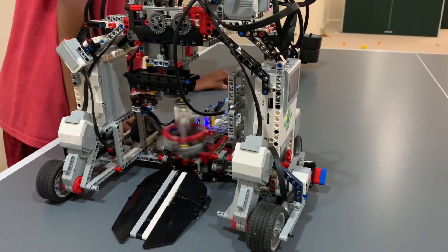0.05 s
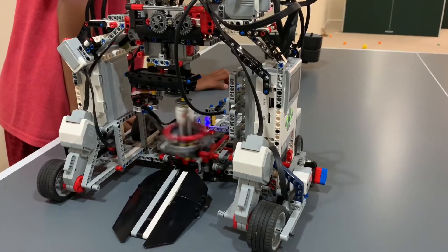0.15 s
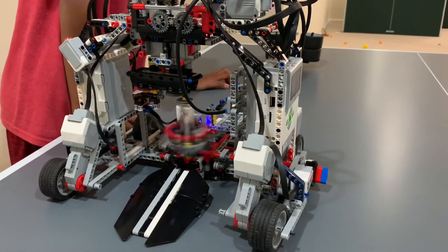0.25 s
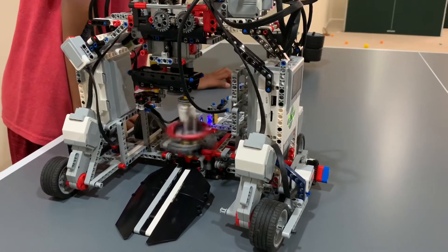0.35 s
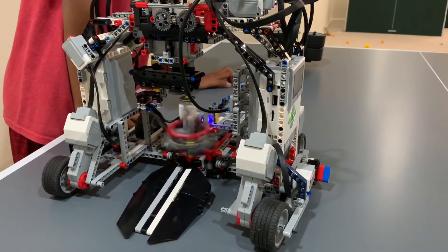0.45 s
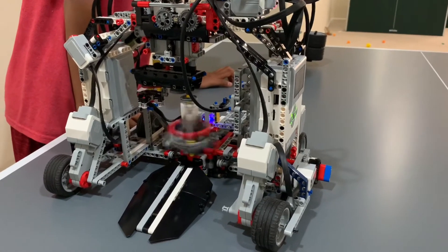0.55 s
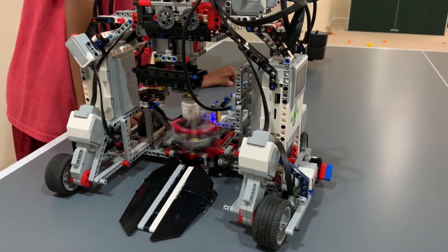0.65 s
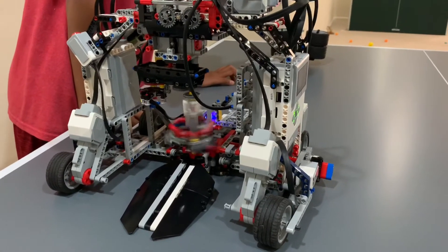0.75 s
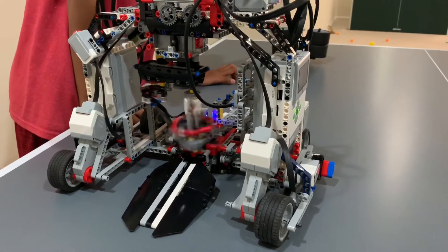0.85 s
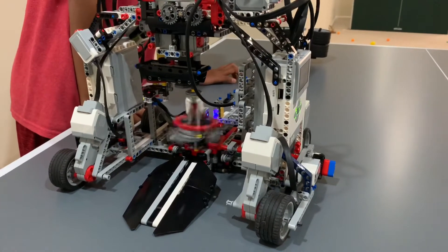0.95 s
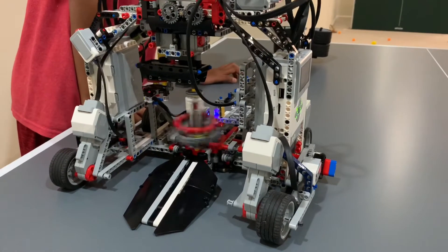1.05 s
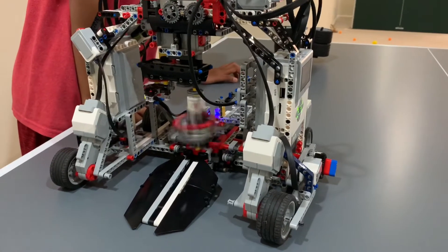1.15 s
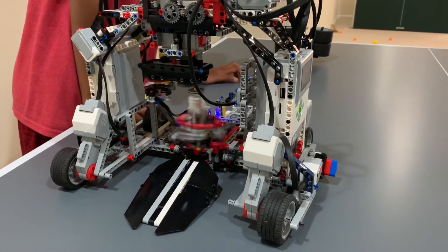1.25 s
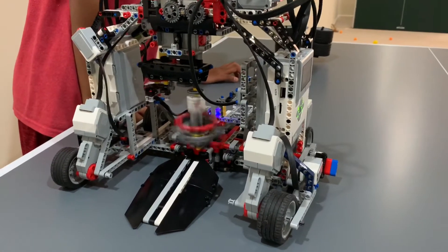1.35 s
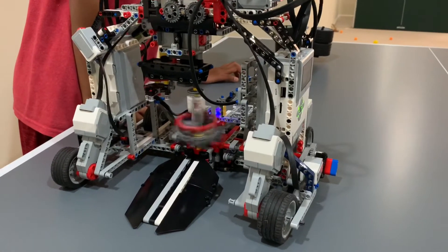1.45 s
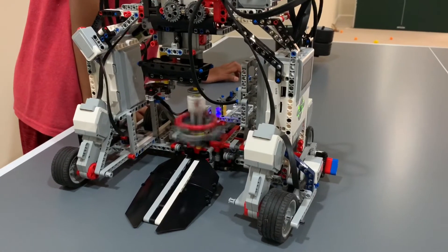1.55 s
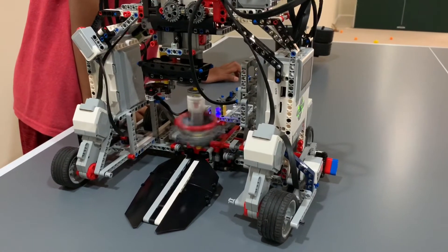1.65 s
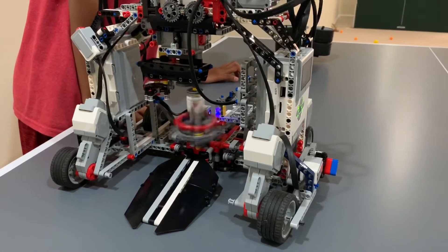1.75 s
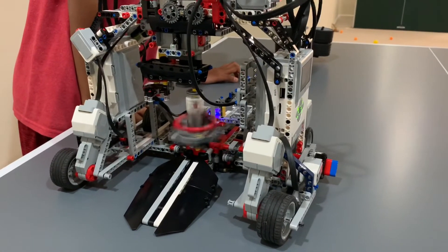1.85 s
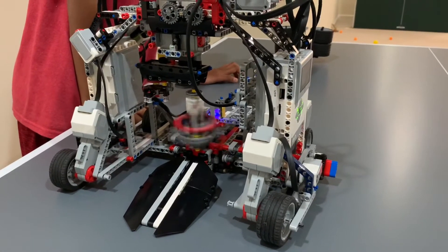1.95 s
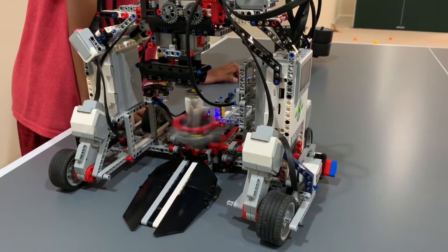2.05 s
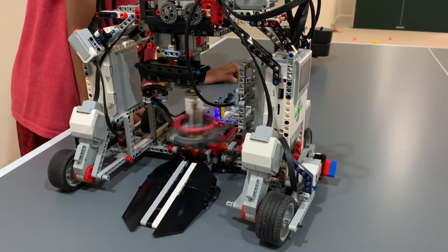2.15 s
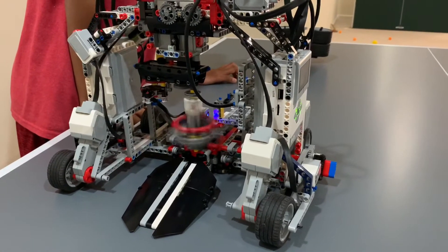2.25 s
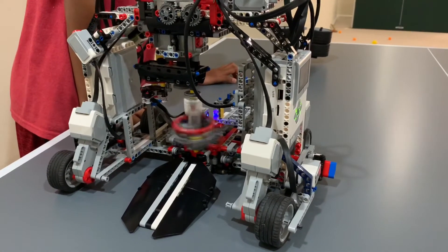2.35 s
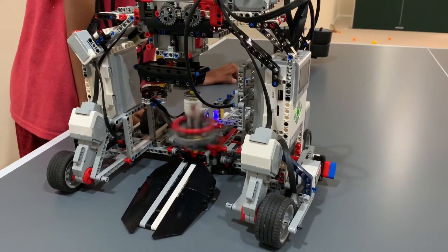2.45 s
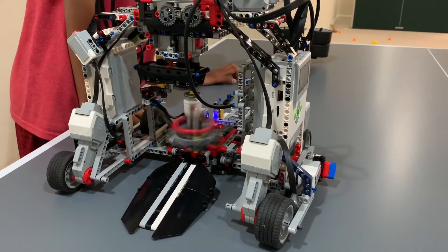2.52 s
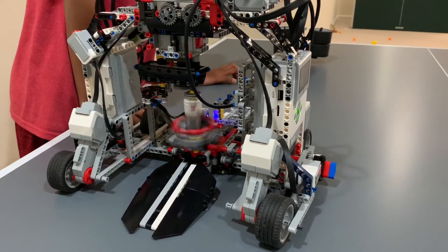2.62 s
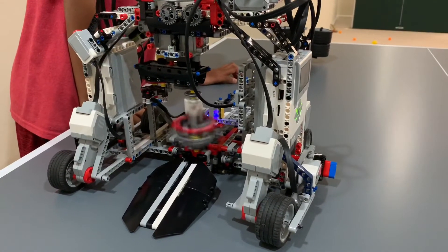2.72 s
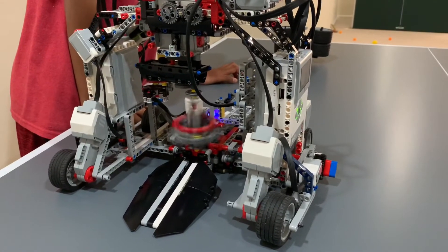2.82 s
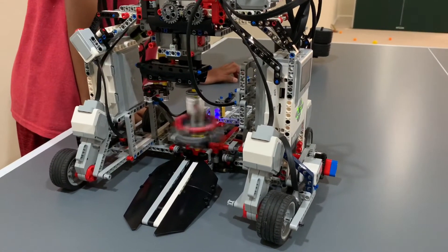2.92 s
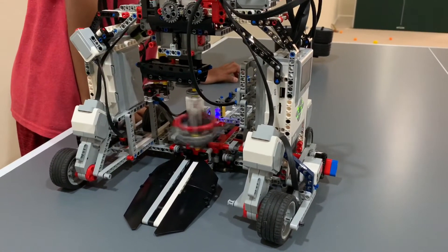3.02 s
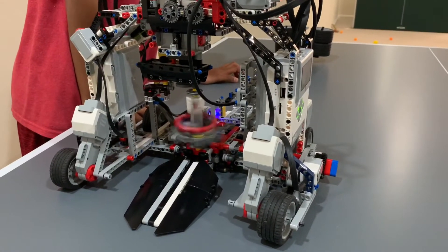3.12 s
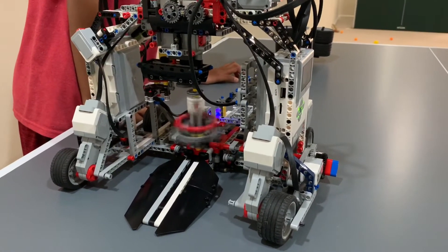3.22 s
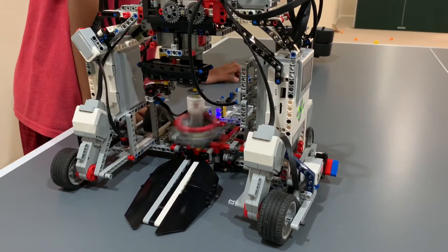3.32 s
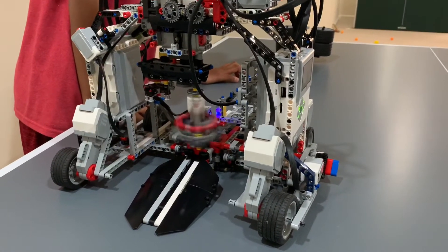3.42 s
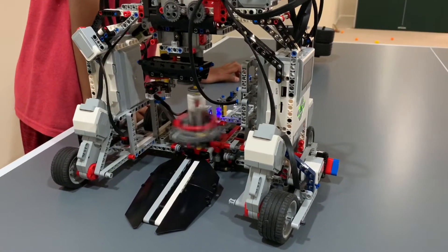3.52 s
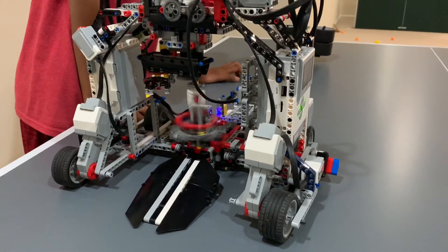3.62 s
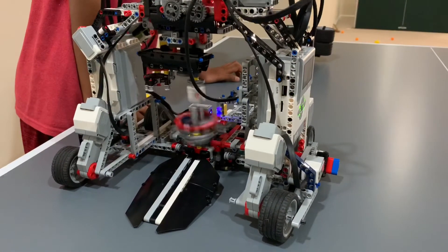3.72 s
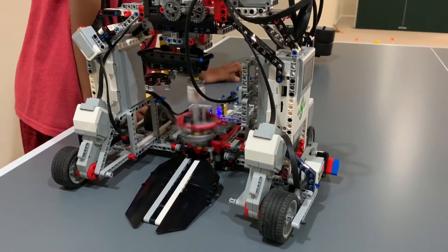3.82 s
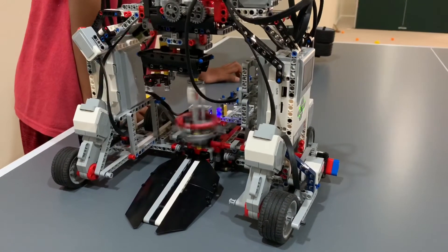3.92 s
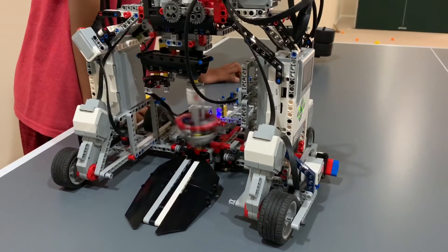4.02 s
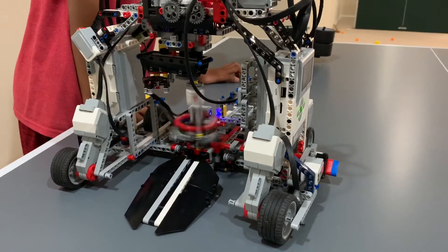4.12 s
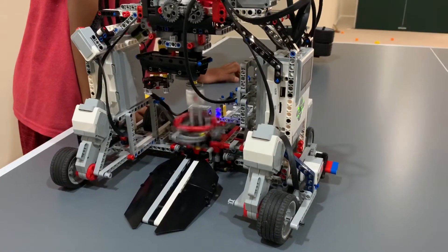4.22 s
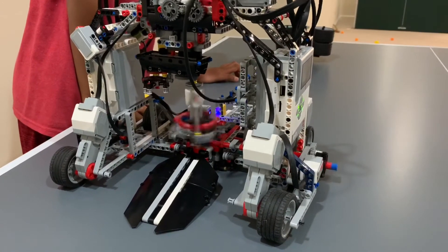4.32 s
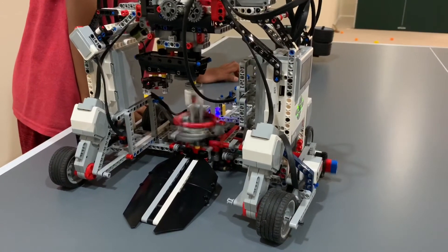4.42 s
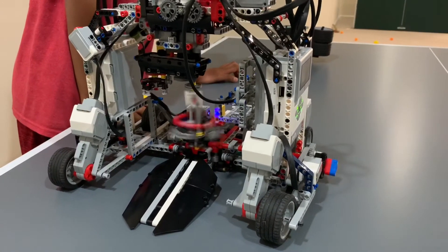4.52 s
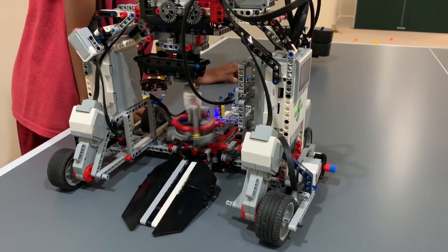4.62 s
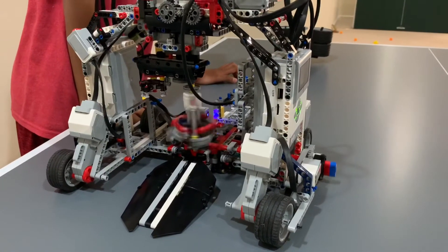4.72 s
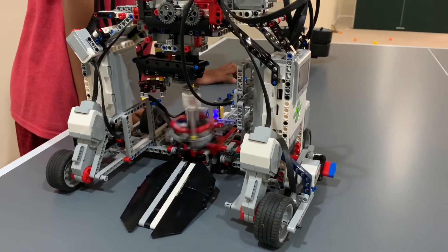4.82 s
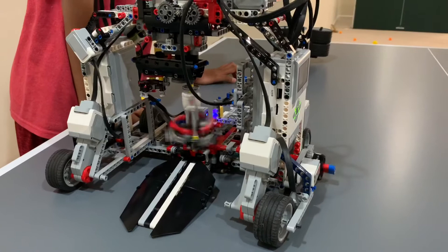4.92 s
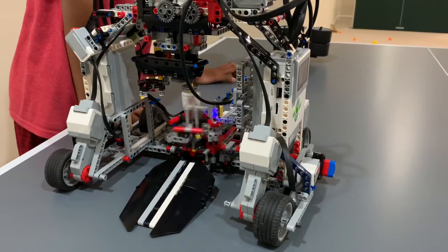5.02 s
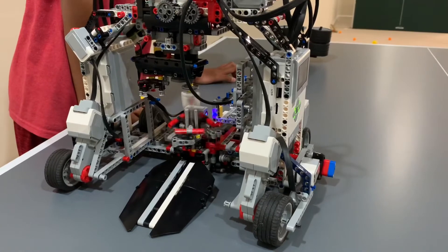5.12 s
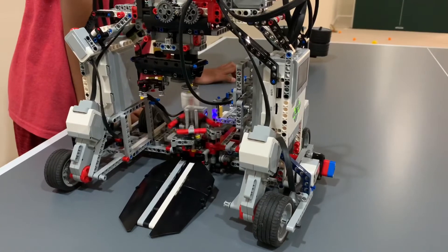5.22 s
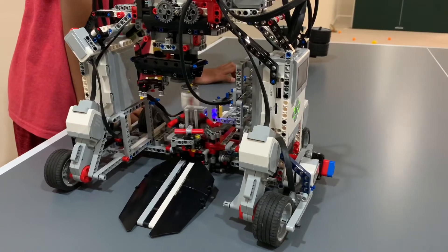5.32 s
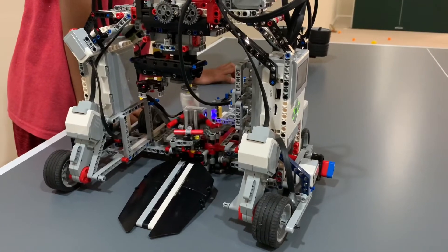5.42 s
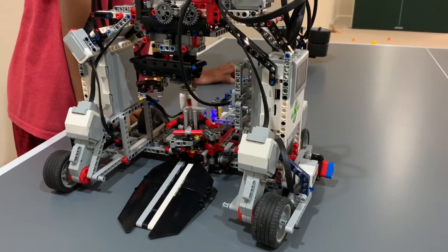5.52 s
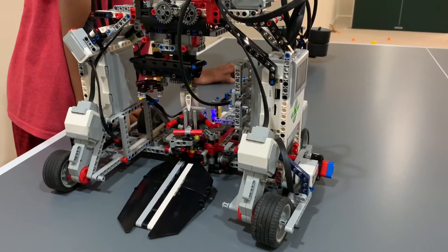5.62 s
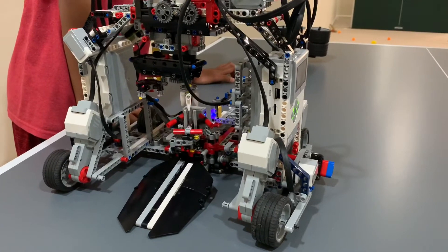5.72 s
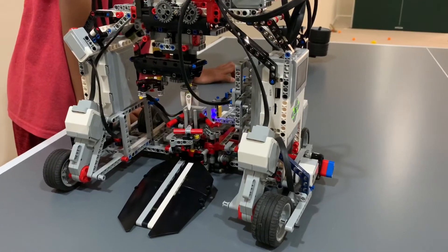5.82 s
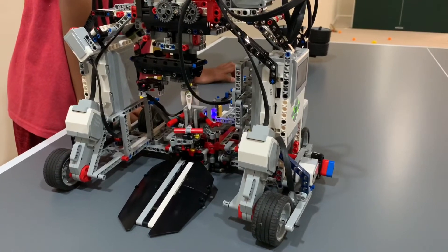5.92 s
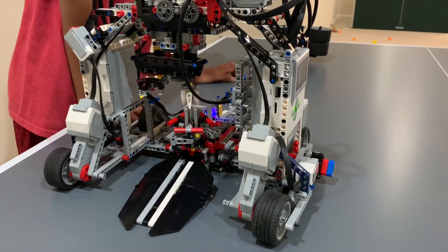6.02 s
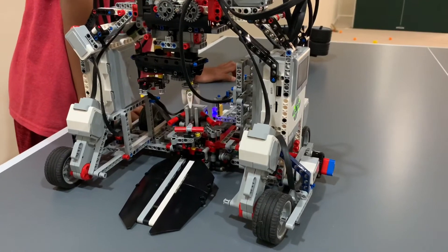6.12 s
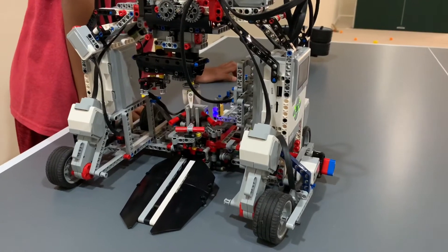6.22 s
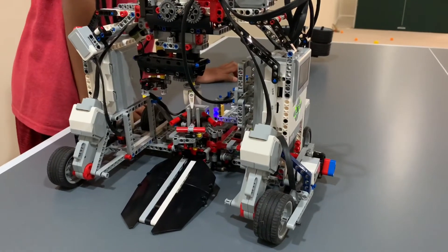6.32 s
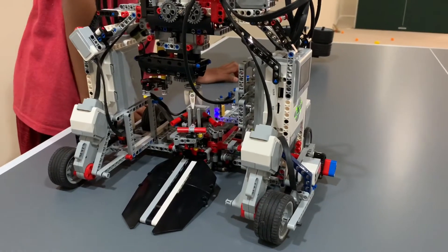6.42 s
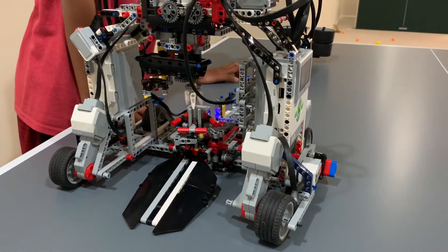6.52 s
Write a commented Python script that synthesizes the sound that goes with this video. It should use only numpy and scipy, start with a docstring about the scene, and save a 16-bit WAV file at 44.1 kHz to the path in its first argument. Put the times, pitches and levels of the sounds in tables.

```python
"""The gears of a toy robot's launcher whine and chatter as its motor runs up: meshing teeth give tones and ticks.
A top of plastic bricks clacks in its holder (filtered noise bursts and struck modes), then runs free for a moment.
Its lugs rattle against the frame until it is braked (cracks, ringing modes, a wall echo); its rim rubs and groans.
The table thuds under the robot, the gears idle and stop, a faint rustle swells, and the room hums throughout."""
import sys
import numpy as np
from scipy import signal
from scipy.fft import rfft, irfft, next_fast_len
from scipy.io import wavfile

SR = 44100
rng = np.random.default_rng(int(sys.argv[2]) if len(sys.argv) > 2 else 0)


def to_wav(sig):
    """Store sig (one row per channel, or 1-D mono) as 16-bit WAV at the path in sys.argv[1].

    Samples outside -1..1 are clipped; the rate is SR.
    """
    pcm = np.clip(np.atleast_2d(sig), -1, 1) * 32767
    pcm = np.round(pcm).astype(np.int16)
    wavfile.write(sys.argv[1], SR, pcm.T)  # frames by channels


N = 289501

# relative spectrum of a contact crack: (frequency [Hz], level [dB])
CRACK_SPECTRUM = [(150, -20), (1200, -17.5), (3000, -11.5), (5600, -11.5), (7200, 0.5), (11000, 2),
                  (12600, 5), (14200, 2.5), (15500, -0.5)]
# relative spectrum of the ringing frame: (frequency [Hz], level [dB])
FRAME_SPECTRUM = [(150, -14), (400, -14.5), (600, -9.5), (1200, -10), (2800, -2.5), (4800, -3.5),
                  (9000, -5.5), (13000, -12.5), (15500, -18)]
# the top's rim rubs on the frame:
# (start [s], end [s], rim level [dB], change of tooth noise [dB], change of whine [dB])
RIM_RUBS = [(.66, .92, -45.5, 2, 4), (1.14, 1.25, -45.5, 1.5, 4), (3.506, 3.638, -41.5, 6, 17),
            (4.111, 4.504, -38.5, -1, -0.5), (4.54, 4.956, -37, 4.5, 9.5)]

# tooth rates: at the start, approached under load, and with the top let go; time constant of the run-up
START_HZ, DRIVEN_HZ, FREE_HZ, RUN_UP_S = 1225, 1890, 2000, 0.7
# the top is let go; the motor is cut; the gears then fall by 60 dB in this time
RELEASE_S, STOP_S, COAST_S = 3.7, 5.372, 0.24


def amp(db):
    """Level in decibels to amplitude ratio, by the factor 20 law."""
    return 10 ** (np.asarray(db) / 20)


def unit(x):
    """Normalisation to a root-mean-square of 1."""
    return x / np.sqrt(np.mean(x ** 2) + 1e-20)


def clock():
    """Sampled time: seconds at each sample."""
    return np.arange(N) / SR


def along(points, hz):
    """Interpolation of (Hz, value) points on a logarithmic frequency axis."""
    f, v = np.transpose(points)
    return np.interp(np.log(hz + 1), np.log(f + 1), v)


def during(start, end, fade):
    """Trapezoidal gate: 1 between two times, with sloping edges inside them."""
    edge_distance = np.minimum(clock() - start, end - clock())
    return np.clip(edge_distance / fade, 0, 1)


def wobble(rate):
    """Band-limited random modulation: a smooth curve with `rate` random knots a second."""
    size = int(N * rate / SR) + 2
    fine = signal.resample(rng.standard_normal(size), 10 * size)
    return np.interp(clock() * rate * 10, np.arange(len(fine)), fine)


def turn(hz):
    """Phase [rad] as the time integral of a changing rate."""
    return 2 * np.pi * np.cumsum(hz) / SR


def filtered(x, response):
    """Linear filtering: the spectrum of x times a complex frequency response."""
    size = next_fast_len(N + SR // 2, True)
    return irfft(rfft(x, size) * response(np.fft.rfftfreq(size, 1 / SR)), size)[..., :N]


def coloured(x, spectrum):
    """Minimum-phase filtering: a causal pulse of unit energy, shaped by the spectrum through its cepstrum."""
    size = 2048
    log_spectrum = np.log(amp(along(spectrum, np.fft.rfftfreq(size, 1 / SR))))
    cepstrum = irfft(log_spectrum)
    pulse = irfft(np.exp(rfft(2 * cepstrum[:size // 2], size)))
    return signal.fftconvolve(x, pulse / np.linalg.norm(pulse))[:N]


def noise():
    """White noise: independent Gaussian samples."""
    return rng.standard_normal(N)


def bursts(times, levels_db, rise, t60, crackle_db=1.8):
    """Impact noise: crackly noise flares at each time and decays exponentially; overlapping powers add."""
    t = np.arange(SR // 4) / SR
    shape = (1 - np.exp(-t / rise)) ** 2 * amp(-60 * t / t60)
    power = np.bincount(np.round(times * SR).astype(int), amp(levels_db) ** 2, N)
    grain = unit(noise() * amp(crackle_db * wobble(900)))
    envelope = np.sqrt(np.abs(signal.fftconvolve(power, (shape / shape.max()) ** 2)[:N]))
    return envelope * grain


def tails(t60_points, size):
    """Diffuse reverberation: two unrelated noise tails of about unit energy, decaying by frequency."""
    hz, t, z = signal.stft(rng.standard_normal((2, size)), SR, nperseg=256)
    decay = amp(-60 * t / along(t60_points, hz)[:, None])
    tail = signal.istft(z * decay, SR, nperseg=256)[1]
    return tail / np.linalg.norm(tail[0])


def tone(hz, flutter):
    """Frequency and amplitude modulation: backlash makes a gear note's pitch and strength unsteady."""
    carrier = np.sin(turn(hz * (1 + flutter * wobble(120))))
    strength_db = 2.3 * wobble(24) + 1.5 * wobble(110)
    return unit(carrier * amp(strength_db))


def room_tone():
    """Partly coherent noise for the background, plus slightly unsteady sinusoids for the hum."""
    # relative spectrum of the background noise: low rumble and faint hiss, with a dip near 8300 Hz:
    # (frequency [Hz], level [dB])
    background_spectrum = [(15, -50), (22, -32), (50, -11.5), (78, -6), (99, -14), (123, -7), (145, -10.5),
                           (254, -13), (315, -23.5), (380, -19.5), (483, -30), (826, -29), (2500, -45.5),
                           (8300, -65), (11000, -57), (15600, -108)]
    # left-right likeness of the background noise: (frequency [Hz], correlation [1])
    background_likeness = [(60, .92), (130, 0.76), (290, 0.858), (640, 0.14), (1400, 0.76), (8000, 0)]
    # mains and fans: (frequency [Hz], mean rms level [dB])
    hum_notes = [(64.6, -60), (119.7, -54.5), (180, -61.5)]

    def mid_side_response(hz):
        # mid and side shares that give the wanted correlation
        angle = np.arccos(np.clip(along(background_likeness, hz), -1, 1)) / 2
        return amp(along(background_spectrum, hz)) * [np.cos(angle), np.sin(angle)]

    mid, side = filtered(rng.standard_normal((2, N)), mid_side_response)
    background = amp(-50) * unit(np.array([mid + side, mid - side]))
    hum = np.zeros(N)
    for hz, db in hum_notes:
        hum += amp(db + 1.5 * wobble(5)) * np.sqrt(2) * np.sin(turn(hz + wobble(6)))
    return background + hum


def rustle():
    """Friction noise: something brushes softly against the frame, swelling after the gears stop."""
    start_s, rise_s, level_db = 6.44, 0.11, -73
    swell = np.clip((clock() - start_s) / rise_s, 0, 1)
    return amp(level_db) * swell * coloured(noise(), FRAME_SPECTRUM)


def thuds():
    """Damped oscillation: the rocking robot makes the table top answer with a short, low note."""
    # blows on the table: (time [s], level before an 8 dB lift [dB])
    table_blows = np.array([(0.801, -46.5), (0.871, -44.5), (4.231, -44.5), (4.629, -51), (4.745, -50.5),
                            (6.261, -49.5)])
    t = np.maximum(clock() - table_blows[:, :1], 0)
    ring = np.sin(2 * np.pi * 178 * t) * (1 - np.exp(-t / 0.0024)) * amp(-60 * t / 0.28)
    return amp(table_blows[:, 1] + 8.0) @ ring


def rubbing():
    """Contact envelope: how firmly the rim touches, 0-1, one row for each rub."""
    attack_s, release_s = 0.055, 0.065  # ramps before the start and after the end
    start, end = np.transpose(RIM_RUBS)[:2, :, None]
    nearest_edge = np.minimum((clock() - start) / attack_s, (end - clock()) / release_s)
    return np.clip(1 + nearest_edge, 0, 1)


def groan():
    """Stick-slip of the rim in its last turns: a short, hoarse note of unsteady pitch."""
    # the note: (start [s], end [s], frequency [Hz], level [dB])
    stick_slip = (4.5, 5, 998, -49.5)
    start, end, hz, db = stick_slip
    return amp(db) * during(start, end, 0.05) * tone(hz, flutter=0.024)


def grind():
    """Friction noise: the wobbling rim brushes the frame, and at last drags ever more weakly as the top slows."""
    # relative spectrum of the rubbing rim: (frequency [Hz], level [dB])
    rim_spectrum = [(150, -17.5), (450, -15.5), (1300, -10), (2200, -7.5), (3500, -4), (4900, -4),
                    (7000, -7.5), (10000, -8), (15500, -13.5)]
    slowing_s, slowing_db_per_s = 4.91, 36  # the drag fades as the top comes to rest
    grain = unit(noise() * amp(2.6 * wobble(1500) + 0.6 * wobble(70)))
    slowing_db = -slowing_db_per_s * np.maximum(clock() - slowing_s, 0)
    pressure = np.max(amp(np.array(RIM_RUBS)[:, 2:3]) * rubbing() ** 2, axis=0)
    return pressure * amp(slowing_db) * coloured(grain, rim_spectrum)


def knock(times, levels_db):
    """Modal resonance: each blow gives the frame's low modes one short push."""
    # modes of the bricks: (frequency [Hz], bandwidth [Hz], relative level [dB])
    brick_modes = [(568, 22.6, 0.5), (652, 43, 1), (833, 29, 1.5), (1530, 130, -2), (2260, 150, -3.5),
                   (2590, 130, 4), (3360, 90, 4)]
    pushes = np.bincount(np.round(times * SR).astype(int), amp(levels_db), N)

    def modal_response(f):
        total = 0
        for k, (centre, width, db) in enumerate(brick_modes):
            resonance = 1j * f * width / (centre * centre - f * f + 1j * f * width)
            total = total + (-1) ** k * amp(db) * resonance  # neighbours alternate in sign
        return total

    return filtered(pushes, modal_response)


def clacks():
    """Light impacts: the top jolts in its holder with bright cracks, a frame ring and modal knocks."""
    # jolts, before the offset of each layer: (time [s], level [dB], ring and knock relative to it [dB])
    holder_jolts = [(0.618, -29, -7.5), (0.688, -31.5, -5.5), (0.739, -17.5, -32), (0.7436, -22, -40),
                    (0.773, -22, -40), (0.787, -16.5, -36), (0.8322, -18.5, -36), (0.847, -17.5, -23),
                    (0.8499, -18, -26), (0.8637, -27, -28), (0.9078, -16.5, -50), (0.917, -21, -14),
                    (0.926, -19, -16), (1.123, -30, -9), (1.1311, -16, -14), (1.141, -20, -22),
                    (2.1908, -27, -38), (2.222, -30.5, -37), (2.6682, -27, -38), (2.961, -29, -38),
                    (3.0523, -32, -38), (3.464, -24.5, -38)]
    s, db, knock_db = np.transpose(holder_jolts)
    crack = coloured(bursts(s, db + 0.5, rise=0.00044, t60=0.011, crackle_db=3.5), CRACK_SPECTRUM)
    ring = coloured(bursts(s, db + knock_db - 0.5, rise=0.00075, t60=0.047, crackle_db=5.5), FRAME_SPECTRUM)
    return crack + ring + knock(s, db + knock_db + 30.5)


def glances():
    """Oblique impact: as the top is braked, a glancing lug skips in sharp ticks and scrapes past."""
    # glancing blows, before the offset of each layer: (time [s], level [dB])
    glancing_blows = [(4.4373, -19), (4.4739, -18.5), (4.5118, -20), (4.5838, -17.5), (4.617, -18.5),
                      (4.6512, -19), (4.6832, -18.5), (4.7139, -21), (4.744, -21), (4.773, -22),
                      (4.803, -23)]
    # skips of each glance over the frame: (delay [s], relative level [dB])
    skip_pattern = [(0, -2), (.0024, -0.5), (.0072, -3)]
    s, db = np.transpose(glancing_blows)
    delay, skip_db = np.transpose(skip_pattern)
    tick_times = (s[:, None] + delay).ravel()
    tick_levels = (db[:, None] + skip_db).ravel()
    ticks = bursts(tick_times, tick_levels, rise=0.0003, t60=0.011)
    scrape = bursts(s, db - 6, rise=0.0018, t60=0.047, crackle_db=1.5)
    ring = bursts(s, db - 9.0, rise=0.0007, t60=0.063)
    return coloured(ticks + scrape, CRACK_SPECTRUM) + coloured(ring, FRAME_SPECTRUM) + knock(s, db + 4.5)


def strikes():
    """Direct impact: each lug gives a hard crack and a short clack; loose bricks ring on and a wall reflects."""
    # square blows, before the offset of each layer: (time [s], level [dB], clack and knock relative to it [dB])
    lug_blows = [(4.1617, -5, -26.5), (4.2295, -6.5, -21.5), (4.2846, -6, -22), (4.3349, -11.5, -17.5),
                 (4.3826, -7.5, -22), (4.4174, -7.5, -34.5), (4.55, -6, -37)]
    wall_s, wall_db = 0.019, -26  # delay and level of the reflection from a near wall
    s, db, knock_db = np.transpose(lug_blows)
    crack = coloured(bursts(s, db - 2, rise=0.00045, t60=0.01, crackle_db=0), CRACK_SPECTRUM)
    clack = coloured(bursts(s, db + knock_db + 10.0, rise=0.00013, t60=0.014), FRAME_SPECTRUM)
    ring = coloured(bursts(s, db - 25.5, rise=0.0015, t60=0.11, crackle_db=0.5), FRAME_SPECTRUM)
    echo = coloured(bursts(s + wall_s, db + wall_db, rise=0.001, t60=0.02), CRACK_SPECTRUM)
    return crack + clack + ring + echo + knock(s, db + knock_db + 36.5)


def driving():
    """Load transfer: 1 while the gears hold the top, sloping to 0 as it is let go."""
    return np.clip((RELEASE_S - clock()) / 0.21, 0, 1)


def running():
    """Run-down: gain of the gears as they coast to rest after the motor is cut."""
    return amp(-60 * (np.maximum(clock() - STOP_S, 0) / COAST_S) ** 2)


def tooth_rate():
    """Meshing frequency: it sags whenever the wobbling top snags and rises once the top is let go."""
    # speed of the motor: (time [s], tooth rate [Hz])
    motor_speed = [(0, 1215), (.13, 1345), (.4, 1440), (.47, 1590), (.55, 1655), (.67, 1530), (.8, 1685),
                   (.97, 1395), (1.06, 1810), (1.15, 1770), (1.28, 1540), (1.39, 1810), (2.1, 1890),
                   (3.38, 1880), (3.48, 1420), (3.535, 1600), (3.6, 1680), (3.66, 1420), (3.74, 2000),
                   (4.04, 2000), (4.14, 1650), (4.3, 2000)]
    s, hz = np.transpose(motor_speed)
    return np.interp(clock(), s, hz)


def sag():
    """Speed droop: tooth rate [Hz] lost against a smooth exponential run-up while the top snags."""
    driven = DRIVEN_HZ - (DRIVEN_HZ - START_HZ) * np.exp(-clock() / RUN_UP_S)
    smooth_hz = FREE_HZ + (driven - FREE_HZ) * driving()
    return np.maximum(smooth_hz - tooth_rate(), 0)


def whine():
    """Gear meshing tones: teeth sing at the meshing rate, its octave, and 3/2 of it from a second wheel."""
    # nearly steady notes of other gears; silent if the end precedes the start:
    # (start [s], end [s], frequency [Hz], level [dB])
    gear_notes = [(1.1, 3.8, 1458, -64.5), (1.3, 5.4, 3945, -51.5), (3.75, 3.2, 1600, -59.5),
                  (4.84, 5.34, 2200, -60.5), (3.71, 4.15, 10520, -49.5), (4.85, 5.4, 10570, -47.5),
                  (4.99, 5.37, 1341, -60.5), (5.03, 5.4, 4800, -56.5)]
    base_db, sag_db_per_hz = -59.5, -0.0085  # the whine weakens as the tooth rate sags
    push_db, push_peak_s, push_fade_s = 9.5, 0.55, 0.1  # it swells while the motor pushes hardest
    note_flutter, flutter_hz = 0.003, 5000  # flutter as a share of pitch; pitch at which it has doubled
    mesh_hz = tooth_rate()
    run_up = np.minimum(clock() / push_peak_s, 1)
    push = np.clip(np.minimum(clock() / push_peak_s, 1 - (clock() - push_peak_s) / push_fade_s), 0, 1)
    rub_db = np.array(RIM_RUBS)[:, 4] @ rubbing()
    level_db = base_db + push_db * push + sag_db_per_hz * sag() + rub_db
    main = tone(mesh_hz, flutter=0.009) * amp(2.5 * wobble(16))
    # the second wheel on the shaft has half as many teeth again
    wheel = amp(1) * tone(mesh_hz * 3 / 2, flutter=0.014) * during(1.3, 3.5, 0.1)
    octave = amp(1 - 9 * run_up) * tone(mesh_hz * 2, flutter=0.011)
    out = amp(level_db) * (main + wheel + octave) * running()
    for start, end, hz, db in gear_notes:
        flutter = note_flutter * (1 + hz / flutter_hz)
        out += amp(db) * during(start, end, 0.025) * tone(hz, flutter)
    return out


def teeth(mesh_hz, scatter_db, slide_db):
    """Impulse train with jitter: a tick of random size per tooth, over the noise of sliding flanks."""
    phase = turn(mesh_hz * (1 + 0.25 * wobble(600)))
    at = np.flatnonzero(np.diff(phase // (2 * np.pi)) > 0)
    ticks = np.zeros(N)
    ticks[at] = (np.sign(noise()) * amp(scatter_db * noise()))[at]
    return unit(unit(ticks) + amp(slide_db) * noise())


def chatter():
    """Modulated tooth impacts: loaded gears throb and tick with the top's turns, free ones buzz with the shaft."""
    # relative spectrum of the tooth noise: (frequency [Hz], level [dB])
    tooth_spectrum = [(500, -15.5), (1000, -14.5), (2350, -9.5), (3000, -7), (3350, -6), (3750, -4),
                      (5300, -8), (6750, -3.5), (7350, 2.5), (7850, -7.5), (8450, -36), (8950, 4),
                      (9600, -3), (10900, 0.5), (11700, -4), (12900, 1.5), (14300, -5.5), (15500, -10)]
    # its tilt when running free: (frequency [Hz], level [dB])
    free_tilt = [(1000, -1), (3500, 0.5), (6000, -4), (12000, -3)]
    # tooth noise at full speed with the top, and without it; its change in dB per unit of relative speed, which
    # scales the rise from rest to full speed
    loaded_db, free_db, growth_db = -37, -41, 9
    mesh_hz, load = tooth_rate(), driving()
    driven_db = loaded_db + growth_db * (START_HZ / DRIVEN_HZ - 1) * np.exp(-clock() / RUN_UP_S)
    rub_db = np.array(RIM_RUBS)[:, 3] @ rubbing()
    level_db = free_db + (driven_db - free_db) * load + rub_db

    spin = turn(mesh_hz / 66.0)  # 66 teeth pass in each turn of the top
    throb = unit(amp(0.32 * np.cos(spin) + 0.58 * np.cos(2 * spin) + 0.59 * wobble(60)))
    passes = clock()[1:][np.diff(spin // (2 * np.pi)) > 0]
    tick_db = 3 * rng.standard_normal(len(passes)) + 1
    ticks = bursts(passes, tick_db, rise=0.0003, t60=0.01, crackle_db=1)
    loaded_teeth = coloured(teeth(mesh_hz, scatter_db=3, slide_db=2), tooth_spectrum)
    loaded = loaded_teeth * throb + coloured(ticks, CRACK_SPECTRUM)

    buzz = unit(amp(2.1 * np.cos(2 * np.pi * 122 * clock())))
    free_teeth = coloured(teeth(mesh_hz, scatter_db=2, slide_db=4), tooth_spectrum)
    free = unit(coloured(free_teeth, free_tilt)) * buzz
    return amp(level_db) * running() * (np.sqrt(load) * loaded + np.sqrt(1 - load) * free)


def scattered(x):
    """Early reflections, smeared and diffuse; their random pattern crossfades to a new one 32 times a second."""
    hop = SR // 32
    out = np.zeros((2, N + SR))
    padded = np.pad(x, (hop, 3 * hop))
    window = np.sin(np.pi * np.arange(2 * hop) / (2 * hop))
    for start in range(0, N + hop, hop):
        # decay of the echoes: (frequency [Hz], t60 [s])
        echo = tails([(500, 0.019), (4000, 0.074), (12000, 0.06)], size=2 * hop)
        piece = signal.fftconvolve((padded[start:start + 2 * hop] * window)[None], echo, axes=1)
        out[:, start:start + piece.shape[1]] += piece
    return out[:, hop:hop + N]


def placed(tones, contacts):
    """Interchannel time and level differences, with scattered contacts and a diffuse room response."""
    # share of the sound that arrives scattered: (frequency [Hz], power share [1])
    scatter_share = [(300, .2), (1200, .55), (2750, .75), (3250, .3), (4500, .7), (7500, .1), (13000, .07)]
    # lean to the left: (frequency [Hz], left-right level difference [dB])
    left_lean = [(150, 0.5), (800, 5), (1500, 3), (2500, 0), (5000, -2.5), (7000, 0)]
    # reverberation of the room: (frequency [Hz], t60 [s])
    room_decay = [(300, 0.91), (2000, 0.66), (6000, 0.26), (14000, 0.2)]
    # delay between the microphones; it sets in above the bass, and in the treble it reverses,
    # back in phase at the last value: the midrange reaches the left first, the treble the right
    lag_s, lag_from_hz, in_phase_hz = 0.000202, 750, 10950

    def share(hz):
        return np.clip(along(scatter_share, hz), 0, 1)

    def direct_response(hz):
        lagging_hz = np.minimum(np.maximum(hz - lag_from_hz, 0), in_phase_hz - hz)
        phase = np.pi * lag_s * lagging_hz * np.array([[1], [-1]])
        return np.sqrt(1 - share(hz)) * np.exp(1j * phase)

    x = tones + contacts
    direct = filtered(x, direct_response)
    delayed = np.pad(x, (400, 0))  # the room answers 400 samples later
    far = signal.fftconvolve(delayed[None], tails(room_decay, size=SR // 2), axes=1)[:, :N]
    around = filtered(scattered(contacts) + amp(-8.5) * far, lambda hz: np.sqrt(share(hz)))
    return filtered(direct + around, lambda hz: amp(along(left_lean, hz) * np.array([[0.5], [-0.5]])))


def scene():
    """Superposition: the placed tones and contacts add to the room tone."""
    tones = whine() + groan() + thuds()
    contacts = chatter() + grind() + clacks() + strikes() + glances() + rustle()
    return placed(tones, contacts) + room_tone()


def record(dry):
    """Band limiting: a very steep low-pass removes the highest treble."""
    band_limit_hz = 15900
    return filtered(dry, lambda hz: 1 / np.sqrt(1 + (hz / band_limit_hz) ** 160))


dry = scene()
out = record(dry)
to_wav(out)
```